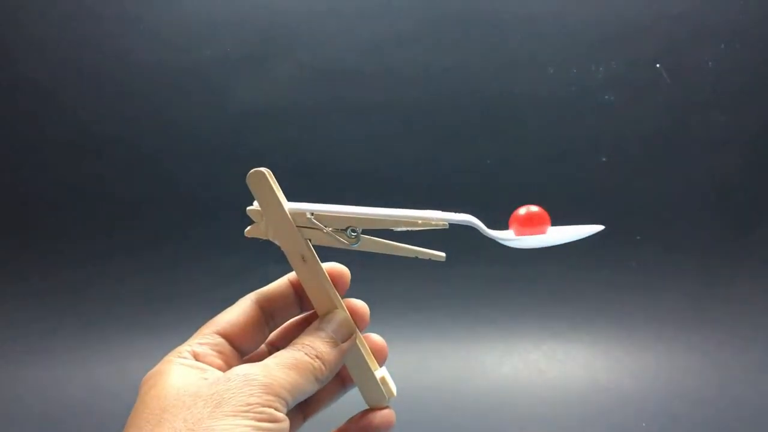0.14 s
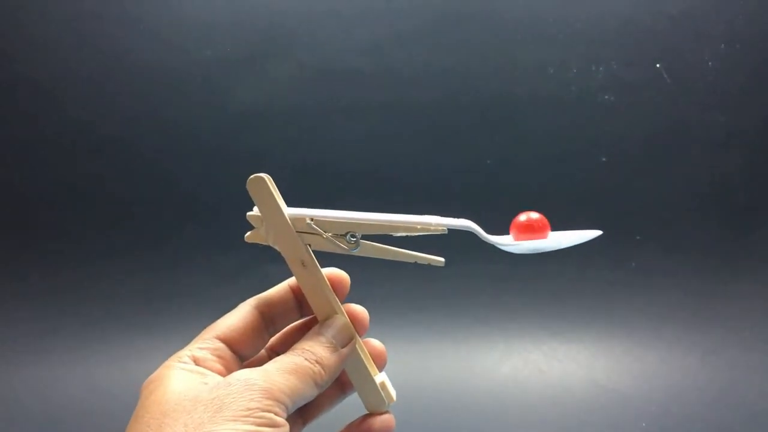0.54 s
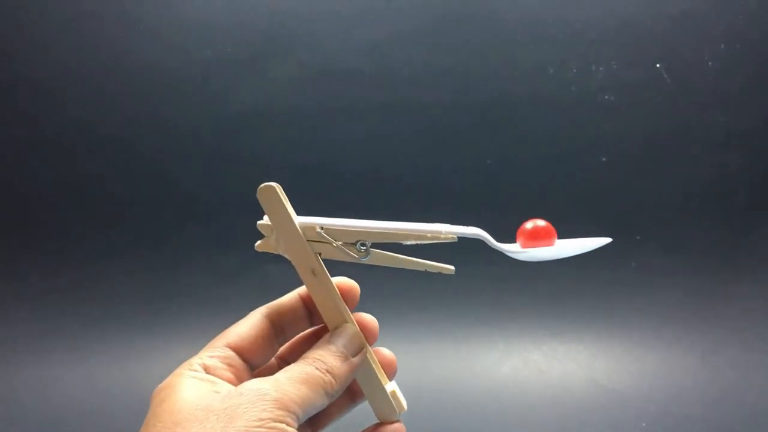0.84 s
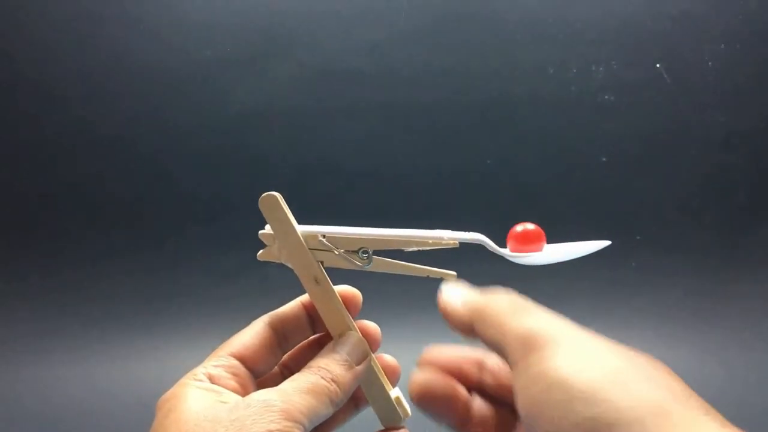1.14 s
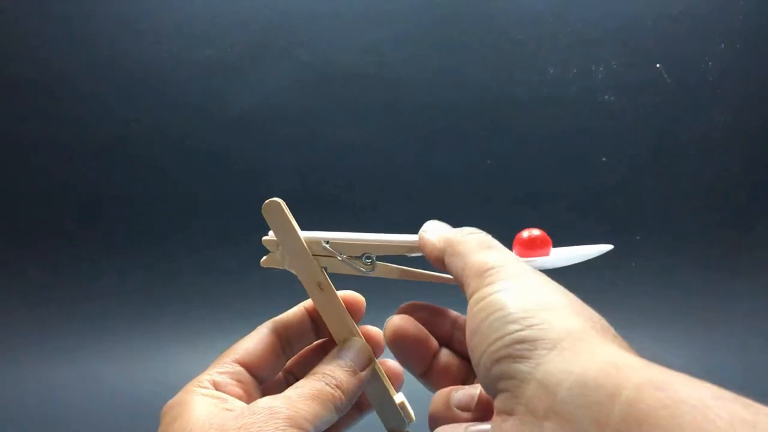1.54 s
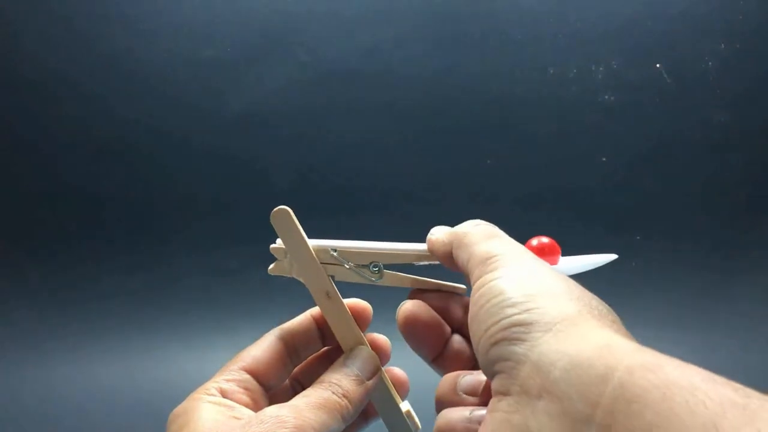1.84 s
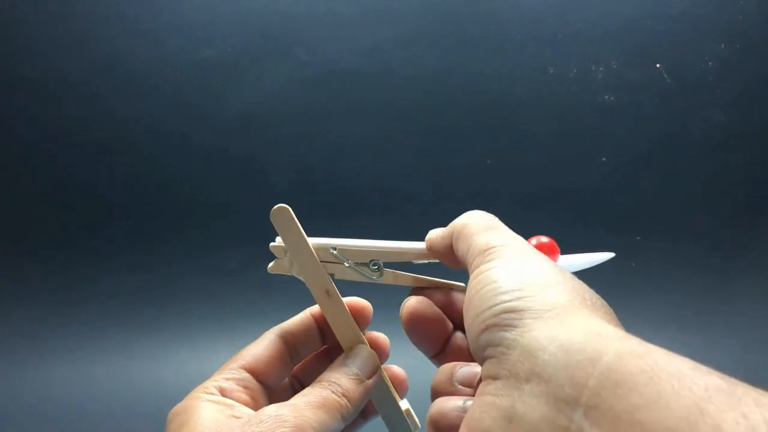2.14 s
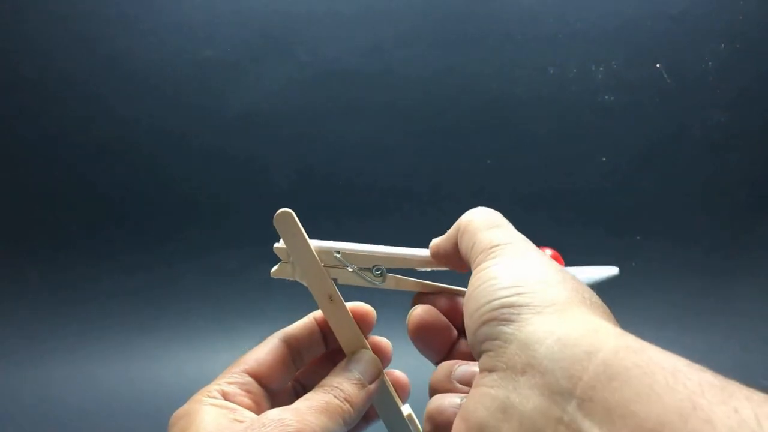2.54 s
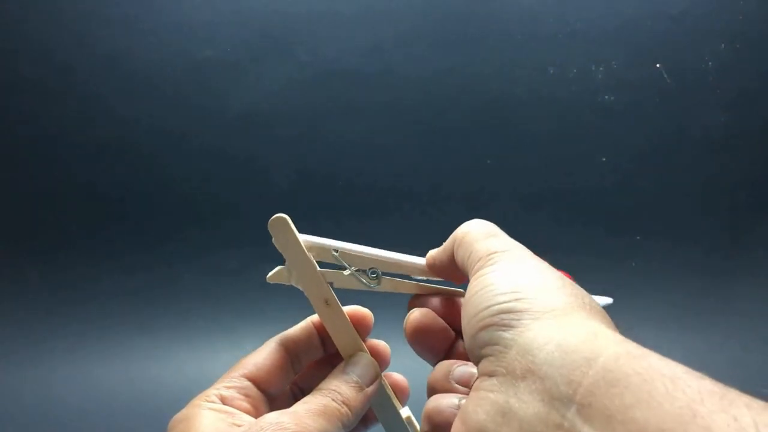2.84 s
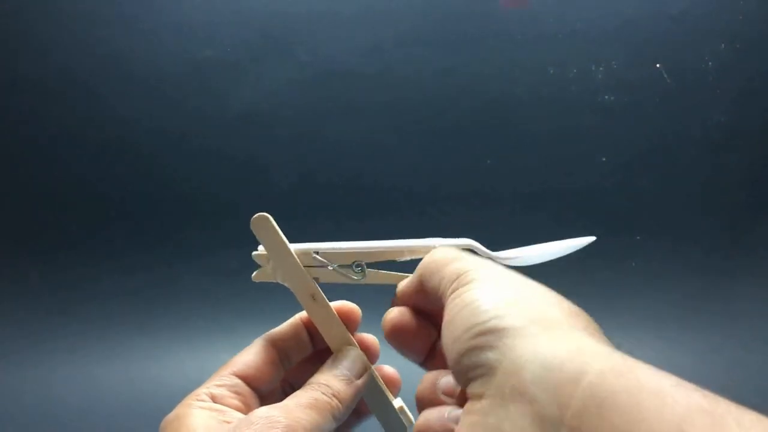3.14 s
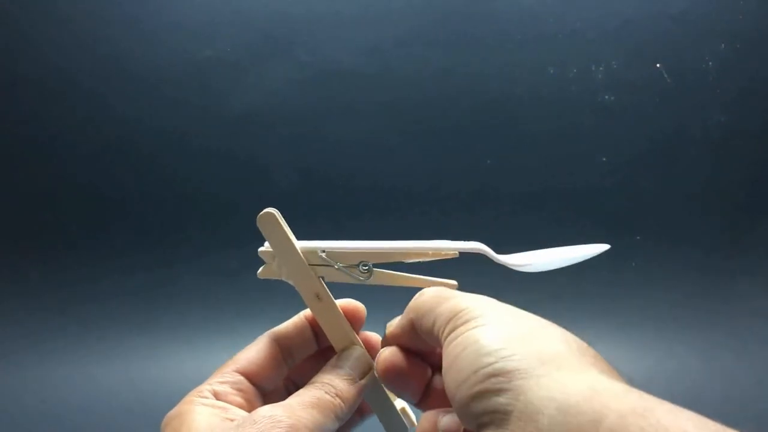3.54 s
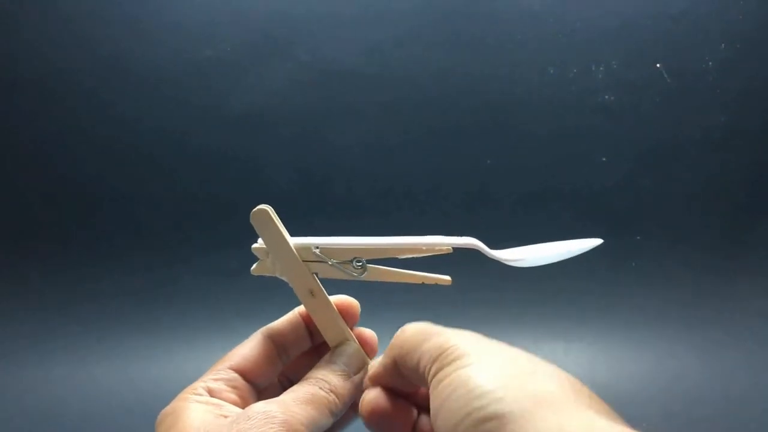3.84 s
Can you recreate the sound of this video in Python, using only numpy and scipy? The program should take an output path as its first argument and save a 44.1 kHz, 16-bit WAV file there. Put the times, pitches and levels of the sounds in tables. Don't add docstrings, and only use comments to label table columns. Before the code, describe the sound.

A small wooden clothespin catapult is quietly handled with faint ticks and rubs, then snaps loudly; its ball knocks a wall and bounces twice on a hollow board, close microphone in a small quiet room.

```python
import sys
import numpy as np
from scipy import signal
from scipy.fft import rfft, irfft
from scipy.io import wavfile
from scipy.ndimage import map_coordinates

SR = 44100
rng = np.random.default_rng(int(sys.argv[2]) if len(sys.argv) > 2 else 0)


def int16_out(signal):
    q = np.round(np.clip(np.atleast_2d(signal).T, -1, 1) * 32767)
    wavfile.write(sys.argv[1], SR, q.astype(np.int16))


def attenuation_scalar(level_db):
    decades = np.asarray(level_db, float) / 20
    return 10 ** decades


N = 176400

# f/Hz, level/dB
HUM_COLOUR = [(12, -64), (20, -25.5), (65, -2), (118, -6), (176, -10), (245, -20), (344, -19), (392, -28.5),
              (600, -41.5), (780, -53.5), (1320, -120)]
# t/s, level/dB
HUM_LEVEL = [(0.0, -63), (1.08, -63), (1.15, -63), (2.65, -64.5), (3.1, -63.5)]
# f/Hz, level/dB
HISS_COLOUR = [(300, -28.5), (600, -8), (1300, -11.5), (2000, -14), (6000, -19), (11500, -22),
               (15500, -39.5)]
# f/Hz, T60/s
ROOM_DECAY = [(100, 0.4), (500, 0.4), (1500, 0.27), (4000, 0.28), (8000, 0.26), (12000, 0.21), (16000, .2)]
# t/s, level/dB, centre f/Hz, width/octaves
TICKS = [(.0500, -39, 5700, 0.74), (0.0548, -38, 614, 0.75), (.0570, -37.5, 92, 0.98),
         (0.062, -48, 10000, 0.26), (0.25, -64, 1170, 0.83), (1.254, -73, 1280, 0.51),
         (2.235, -68.5, 1870, 0.74), (2.594, -56.5, 8750, 1.6), (2.634, -63.5, 1310, 0.17),
         (2.6560, -56, 1800, 0.71), (2.704, -50, 1920, 1), (2.713, -60, 1990, .9),
         (3.7444, -50, 5940, 0.55), (3.7555, -56, 6900, 3)]
# t/s, half length/s, level/dB, centre f/Hz,
# width/octaves
RUBS = [
    (0.493, 0.056, -79, 9200, 0.77),
    (0.652, 0.048, -77.5, 7000, 0.61),
    (0.766, .04, -74, 13300, 0.72),
    (2.926, 0.016, -77, 7700, .5),
    (0.082, 0.037, -66.5, 580, 0.8),
    (.62, .15, -82.5, 1660, 0.64),
        (.275, .03, -73, 1400, .75),
    (1.28, .035, -76, 1600, .7),
    (2.245, .028, -74, 2000, .9),
]
# t/s, level/dB
SPRING_TICKS = [
    (2.657, -71),
    (2.704, -58),
]
# f/Hz, level/dB, T60/s
SPRING_MODES = [(5600, -8, .04), (6950, 0, .07), (11800, -4, .05)]
# t/s, level/dB
SNAPS = [
    (3.1612, -53),
    (3.1814, -25),
    (3.1838, -10),
    (3.1853, -14),
    (3.1903, -23),
]
# f/Hz, level/dB
SNAP_COLOUR = [(88, -45.5), (150, -19.5), (1380, -12.5), (2600, -2), (2870, -11), (4970, 5), (7660, -6),
               (13000, 1), (16500, -28.5)]
# f/Hz, level/dB, T60/s
ARM_MODES = [(4670, -21, 0.017), (10000, -6.5, .012)]
# t/s, level/dB
WALL_HITS = [
    (3.4203, -16.5),
    (3.4300, -24.5),
]
# f/Hz, level/dB
WALL_COLOUR = [(47, -26), (80, -12.5), (298, -1.5), (521, -15), (2480, 0), (4430, -10.5), (5290, -20),
               (15100, -48.5), (16500, -37)]
# f/Hz, level/dB, T60/s
WALL_MODES = [(145.6, -27, 0.38), (264, -32.5, .15), (411, -30, .12), (2323, -7, .03), (2894, -17, .03),
              (4255, 1.5, 0.02)]
# t/s, level/dB, tilt/(dB per octave), crack level/dB
BOUNCES = [
    (3.7674, -11, 0, 4),
    (3.8870, -20, -4, 9),
]
# f/Hz, level/dB
BOARD_COLOUR = [(50, -19.5), (350, -7.5), (850, -17.5), (1150, -0.5), (2300, -6.5), (5600, -7),
                (12000, -20.5), (16500, -35)]
# f/Hz, level/dB, T60/s
BOARD_MODES = [(118.5, -24, 0.085), (264, -22, 0.11), (390, -15.5, 0.068), (727, -34, 0.11),
               (1119.6, -3.5, 0.087), (1300, -33, 0.029), (1660, -14, 0.065), (2018, -13.5, 0.13),
               (2530, -9.5, 0.024)]
# from t/s, to t/s
WIDE_SPANS = [
    (.04, .16),
    (.47, .52),
    (.6, .81),
    (2.58, 2.67),
    (2.69, 2.73),
    (3.15, 3.59),
    (3.74, 4.1),
]
# from t/s, to t/s, kept below f/Hz
STARVED_SPANS = [
    (3.6, 3.625, 9000),
    (3.625, 3.655, 4500),
    (3.7, 3.73, 5000),
]
# t/s, rise/s, level/dB
PRE_ECHOES = [
    (3.4203, 0.0043, -50),
    (3.7674, 0.0046, -38),
    (3.8870, 0.0033, -45),
]

ROUGH_HZ = 20
NEAR_LIVE = 0.75


def unit(x):
    return x / np.sqrt(np.mean(x ** 2) + 1e-20)


def along(points, hz):
    f, v = np.transpose(points)
    return np.interp(np.log(hz + 1), np.log(f + 1), v)


def wobble(rate):
    knots = rng.standard_normal(int(N * rate / SR) + 4)
    return map_coordinates(knots, [np.arange(N) * rate / SR])


def coloured(x, db_of):
    size = 4096
    gain = attenuation_scalar(db_of(np.fft.rfftfreq(size, 1 / SR)))
    cepstrum = irfft(np.log(gain + 1e-6))
    cepstrum[1:size // 2] *= 2
    cepstrum[size // 2 + 1:] = 0
    response = irfft(np.exp(rfft(cepstrum)))
    return signal.fftconvolve(x, response / np.linalg.norm(response))[:len(x)]


def hump(centre_hz, octaves):
    return lambda f: np.maximum(-3 * (np.log2((f + 1) / centre_hz) / octaves) ** 2, -70)


def add(track, s, x):
    part = track[round(s * SR):][:len(x)]
    part += x[:len(part)]


def room_tone():
    t = np.arange(N) / SR
    hum_db = np.interp(t, *np.transpose(HUM_LEVEL))
    hum = attenuation_scalar(1.5 * wobble(6)) * unit(coloured(rng.standard_normal(N), lambda f: along(HUM_COLOUR, f)))
    motor_hz = 110.3 + 3 * wobble(9)
    motor = attenuation_scalar(-64 + 1.9 * wobble(6.8)) * np.sin(2 * np.pi * np.cumsum(motor_hz) / SR)
    hiss = unit(coloured(rng.standard_normal(N), lambda f: along(HISS_COLOUR, f)))
    hiss = attenuation_scalar(-80 + 0.3 * wobble(24.85)) * hiss
    return attenuation_scalar(hum_db) * hum + motor * attenuation_scalar(hum_db - hum_db.mean()) + hiss


def room(db_of, live=1):
    hz, t, z = signal.stft(rng.standard_normal(SR * 3 // 4), SR, nperseg=256)
    t60 = live * along(ROOM_DECAY, hz)[:, None]
    tail = signal.istft(z * attenuation_scalar(-60 * t / t60), SR, nperseg=256)[1]
    build_up = 1 - np.exp(-np.arange(len(tail)) / SR / 0.0048)
    tail = coloured(tail * build_up, db_of)
    return tail / np.linalg.norm(tail)


def hit(db_of, modes, crack_db, crack_t60, buzz_t60, swell_s, wet_db, rough_hz=ROUGH_HZ, live=1):
    tail = room(db_of, live)
    n = len(tail)
    t = np.arange(n) / SR
    crack = rng.standard_normal(n) * attenuation_scalar(crack_db - 60 * t / crack_t60)
    crack = coloured(crack, lambda f: 0.55 * db_of(f))
    swell = 1 - np.exp(-t / swell_s)
    buzz = coloured(rng.standard_normal(n) * attenuation_scalar(-60 * t / buzz_t60) * swell, db_of)
    ring = np.zeros(n)
    for hz, db, t60 in modes:
        drift = np.cumsum(rng.standard_normal(n)) * np.sqrt(2 * np.pi * rough_hz / SR) + rng.uniform(0, 8.6)
        phase = 2 * np.pi * hz * t + drift * min(hz / 2500, 1) ** 2
        ring += attenuation_scalar(db - 60 * t / t60) * np.sin(phase)
    ring *= swell
    ring_wet = signal.fftconvolve(ring, room(lambda f: 0 * f))[:n]
    wet = np.linalg.norm(crack + buzz) * tail + attenuation_scalar(-10.5) * ring_wet
    return crack + buzz + ring + attenuation_scalar(wet_db) * wet


def handling():
    out, t = np.zeros(N), np.arange(N) / SR
    for s, db, hz, octaves in TICKS:
        tick = hit(hump(hz, octaves), [], -6.5, 0.0035, 0.015, 0.00013, wet_db=-7.5, live=NEAR_LIVE)
        add(out, s, attenuation_scalar(db) * tick)
    for s, db in SPRING_TICKS:
        tick = hit(hump(7780, .8), SPRING_MODES, -6, .003, 0.0037, 0.001, wet_db=-20, rough_hz=12)
        add(out, s, attenuation_scalar(db) * tick)
    for s, half, db, hz, octaves in RUBS:
        stroke_db = db - 5.1 * ((t - s) / half) ** 4 + 0.83 * wobble(110)
        out += attenuation_scalar(stroke_db) * coloured(rng.standard_normal(N), hump(hz, octaves))
    return out


def arm():
    out = np.zeros(N)
    colour = lambda f: along(SNAP_COLOUR, f)
    for k, (s, db) in enumerate(SNAPS):
        modes = ARM_MODES if k == 2 else []
        slap = hit(colour, modes, 0, 0.0011, 0.01, 0.00066, wet_db=-9.5, live=NEAR_LIVE)
        add(out, s, attenuation_scalar(db) * slap)
    t = np.arange(-SR // 20, 0) / SR
    scrape = coloured(rng.standard_normal(len(t)) * np.exp(t / 0.0027), colour)
    add(out, 3.1838 + t[0], attenuation_scalar(-29.5) * scrape)
    t = np.arange(SR // 2) / SR
    envelope = attenuation_scalar(-29.5 - 60 * t / 0.11) * (1 - np.exp(-t / 0.016)) ** 2
    add(out, 3.186, envelope * np.sin(2 * np.pi * 66.2 * t))
    return out


def ball():
    out = np.zeros(N)
    for k, (s, db) in enumerate(WALL_HITS):
        modes = WALL_MODES if k == 0 else []
        knock = hit(lambda f: along(WALL_COLOUR, f), modes, -3, 0.0023, 0.047, .0005, wet_db=-8.5)
        add(out, s, attenuation_scalar(db) * knock)
    for s, db, tilt_db, crack_db in BOUNCES:
        colour = lambda f: along(BOARD_COLOUR, f) + tilt_db * np.log2(1 + f / 3000)
        bounce = hit(colour, BOARD_MODES, crack_db, 0.0022, 0.061, 0.0028, wet_db=-9.5)
        add(out, s, attenuation_scalar(db) * bounce)
    return out


def scene():
    return (room_tone() + handling() + arm() + ball())[None]


def band_limit(x):
    return signal.sosfilt(signal.butter(12, 17000, fs=SR, output="sos"), x)


def record(dry):
    window = np.sin(np.pi * (np.arange(2048) + .5) / 2048)
    how = dict(fs=SR, window=window, nperseg=2048, noverlap=1024)
    smear, lead = np.zeros(N), np.arange(-1024, 0) / SR
    smear_band = lambda f: -60. * (f > 3550) - 20. * (f < 500)
    for s, rise, db in PRE_ECHOES:
        noise = coloured(rng.standard_normal(len(lead)), smear_band)
        add(smear, s + lead[0], attenuation_scalar(db) * noise * (0.15 + np.exp(lead / rise)))
    hz, t, z = signal.stft(dry + smear, **how)
    f = hz[:, None]
    air = signal.stft(rng.standard_normal(N), **how)[2] * attenuation_scalar(-74) * (f > 2500)
    wide = sum((t > a) & (t < b) for a, b in WIDE_SPANS) > 0

    chance = rng.random((len(t), 2))
    starve = ~wide & (chance[:, 0] < .36)
    starve[1:] &= ~starve[:-1]
    kept_hz = np.where(starve, 1200 * 3.5 ** chance[:, 1], SR)
    for a, b, top_hz in STARVED_SPANS:
        kept_hz[(t > a) & (t <= b)] = top_hz

    band = np.clip(22 * np.log(hz / 800 + 1), 0, 59).astype(int)
    holes = (rng.random((60, len(t))) < .06)[band] & ~wide & (f > 1200)

    wide_hz, narrow_hz = 15500, 12300
    peak = np.abs(z[0, hz > wide_hz]).mean(0) > 2e-5
    edge_hz = np.where(peak, 16600, np.where(wide, wide_hz, narrow_hz))
    gain = (f < edge_hz) * np.where((f > kept_hz) | holes, attenuation_scalar(-20), 1)
    mix = signal.istft((z + air * (wide & (t > 3))) * gain, **how)[1][:, :N]
    return band_limit(mix)


dry = scene()
out = record(dry)
int16_out(out)
```